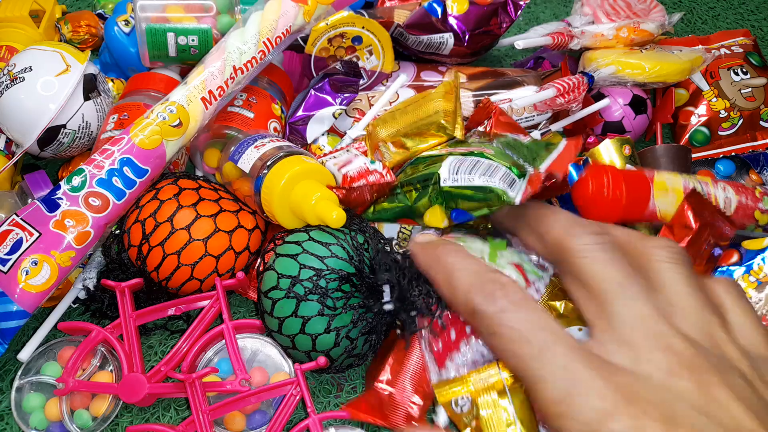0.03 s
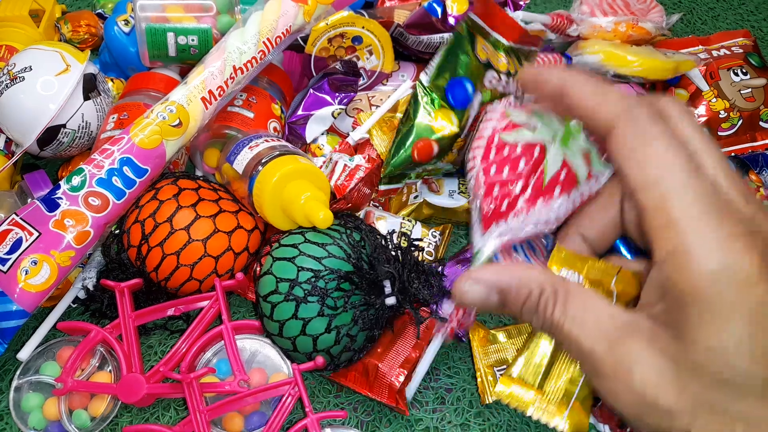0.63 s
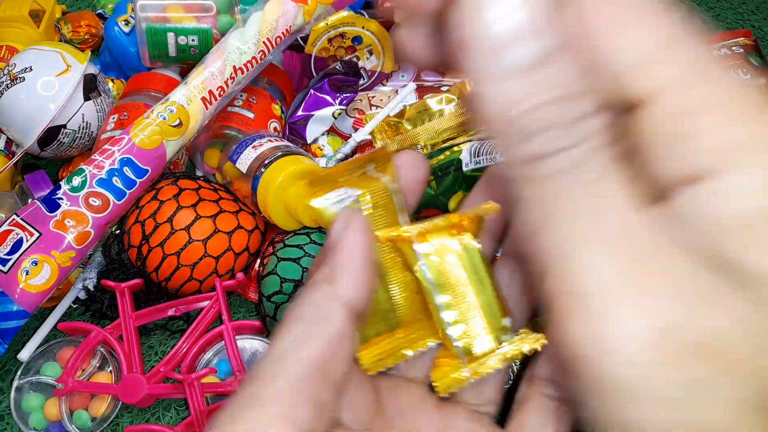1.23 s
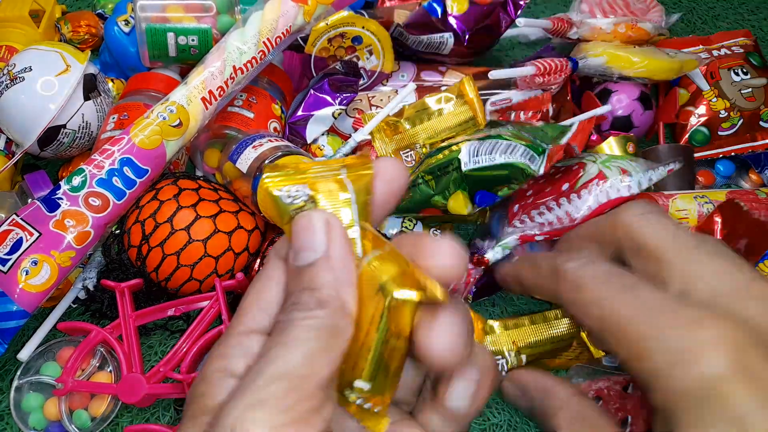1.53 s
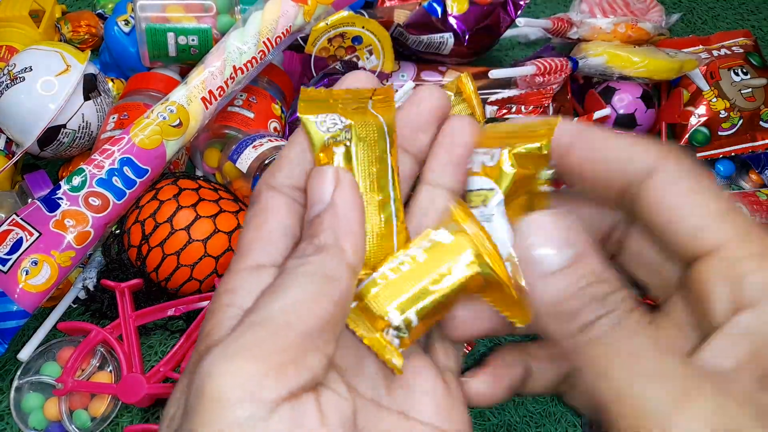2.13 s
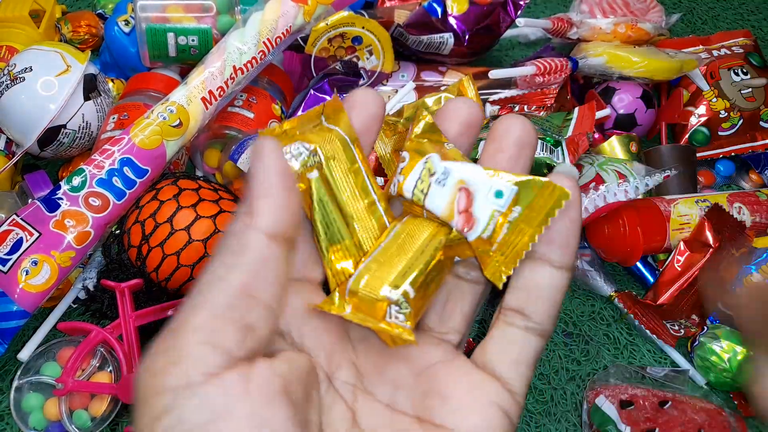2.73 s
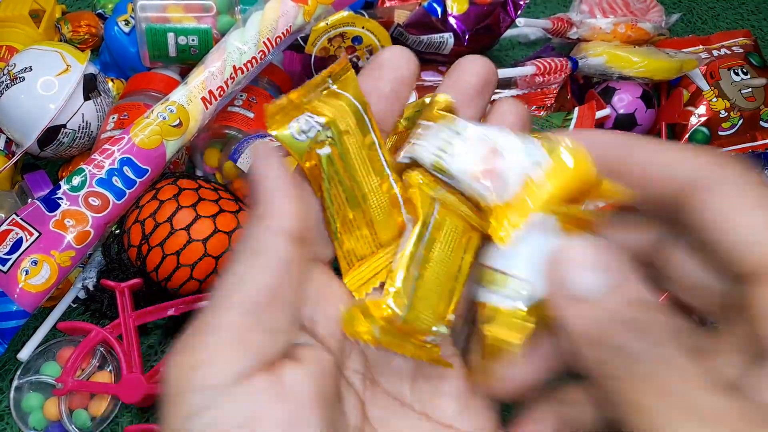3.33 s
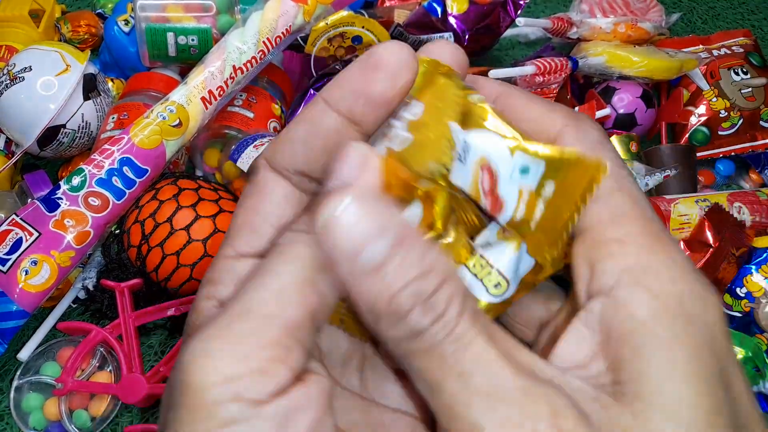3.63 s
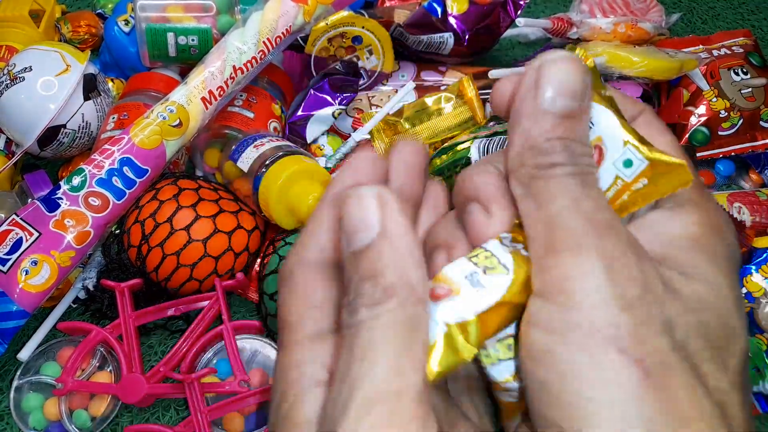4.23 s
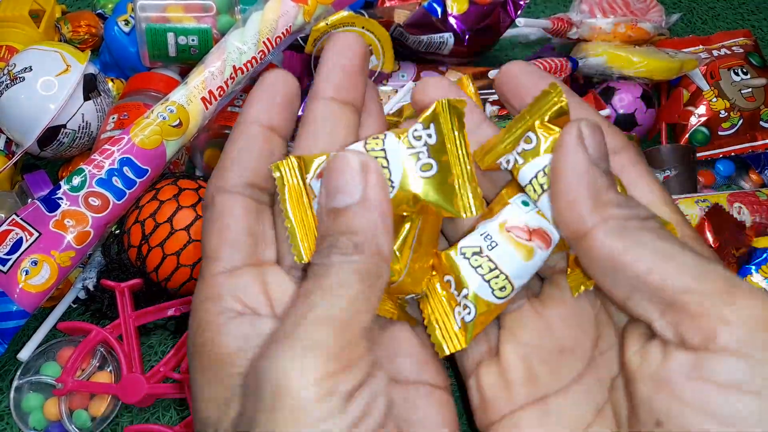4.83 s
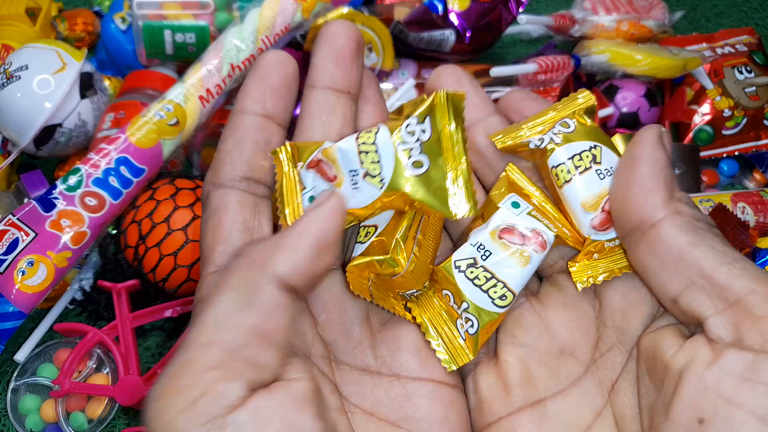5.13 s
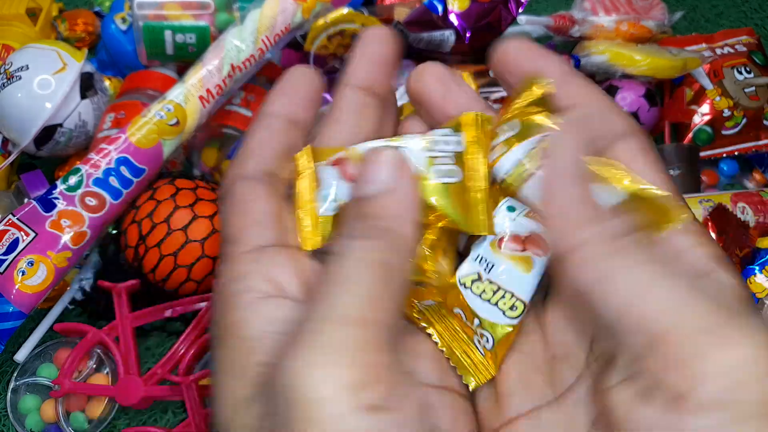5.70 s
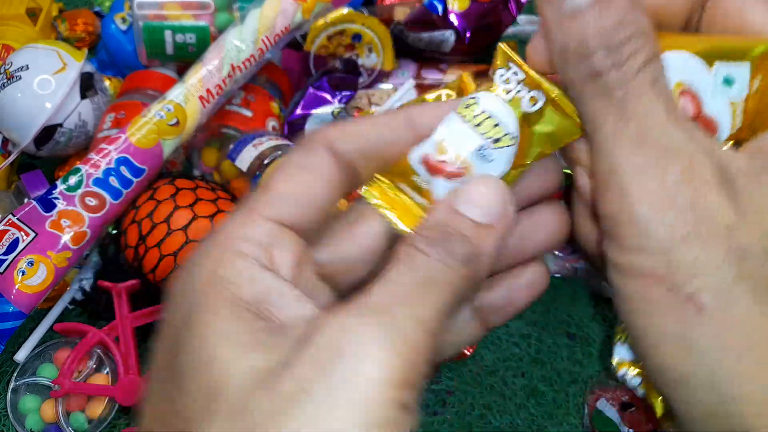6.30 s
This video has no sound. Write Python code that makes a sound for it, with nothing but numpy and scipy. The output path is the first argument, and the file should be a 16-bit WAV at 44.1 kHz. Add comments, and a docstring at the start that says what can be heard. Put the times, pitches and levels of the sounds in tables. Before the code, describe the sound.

Hands rummage in a heap of sweets and roll foil-wrapped bars between the palms, with close, sharp snaps, crackles and soft bumps.

```python
"""A sharp snap of foil and a soft thud: hands rummage in a heap of sweets on a mat, close to a stereo
microphone. They pick up a few bars in plastic foil and roll them between the palms. The foil buckles
in single snaps and in swarms of tiny crackles, the swarms coloured by the hollow of the hands or heap.
Sweets bump softly, the moving hands rumble, and a small furnished room with a low hum answers."""
import sys
import numpy as np
from scipy import signal
from scipy.fft import rfft, irfft, next_fast_len
from scipy.io import wavfile

SR = 44100
rng = np.random.default_rng(int(sys.argv[2]) if len(sys.argv) > 2 else 0)


def store_pcm(level_fs):
    """Save levels as 16-bit WAV."""
    pcm = np.round(np.clip(level_fs, -1, 1) * 32767).astype(np.int16)
    wavfile.write(sys.argv[1], SR, np.atleast_2d(pcm).T)


N = 284886
T = np.arange(N) / SR

# spectrum of the room's steady rumble: (frequency [Hz], relative level [dB])
ROOM_SPECTRUM = [(25, -2.5), (60, -10), (95, -1), (135, 11.5), (220, -0.5), (400, -38.5), (800, -80),
                 (2000, -31), (6000, -52.5), (16000, -45)]
# partials of the hum in the room: (frequency [Hz], level [dB])
HUM_PARTIALS = [(59.5, -74), (122, -71), (243, -74)]
# colour of the tail that comes back from the walls: (frequency [Hz], gain [dB])
WALL_COLOUR = [(60, 4), (400, -5), (2000, -7), (5000, -8.5), (16000, -9.5)]
# a hand digs in the heap and shifts the sweets: (start [s], length [s], rumble level [dB])
HEAP_DIGS = [(0.067, 0.75, -51.5), (1.551, 0.22, -49), (2.91, 0.089, -50.5)]
# sweets and knuckles bump each other, the heap and the mat: (time [s], level [dB], pitch [Hz], t60 [s])
SOFT_BUMPS = [(0.073, -24.5, 585, 0.061), (0.077, -42, 209, 0.27), (0.829, -35, 326, 0.058),
              (0.848, -33.5, 226, 0.2), (0.864, -45, 68, 0.38), (1.226, -29.5, 950, 0.026),
              (1.229, -33.5, 300, 0.051), (1.561, -31.5, 70, 0.1), (1.58, -30, 234, 0.11),
              (1.598, -32, 350, 0.045), (2.805, -39.5, 990, 0.048), (2.936, -51, 78.5, 0.57),
              (2.987, -45, 260, 0.043), (3.038, -45, 234, 0.23)]
# the fingers press or roll the foil inside a hollow, the heap or the cupped hands: (start [s], hold [s],
# crackle level [dB], hollow resonance [Hz], resonance height [dB], tilt [dB/octave])
FINGER_SQUEEZES = [(0.087, 0.24, -34.5, 700, -0.5, -2), (0.324, 0.4, -30.5, 1060, 1, -3),
                   (0.779, 0.078, -34, 1060, -1, -4), (0.943, 0.021, -44.5, 900, -4, -3.5),
                   (1.093, 0.061, -36, 704, -5, -3), (1.217, 0.071, -50.5, 680, 16, -2.5),
                   (1.477, 0.02, -43, 1450, 5, -0.5), (1.539, 0.19, -29.5, 700, -4.5, -2.5),
                   (1.802, 0.2, -38, 690, 8, 0), (2.092, 0.11, -42, 705, 2, 0),
                   (2.345, 0.047, -31.5, 704, -1.5, -1.5), (2.429, 0.13, -35.5, 1380, -1.5, -2),
                   (2.905, 0.034, -40, 680, 11, -2), (3.005, 0.028, -37, 704, -9, -4.5),
                   (3.172, 0.048, -51, 880, 7, 2), (3.366, 0.091, -37.5, 696, -4, -3.5),
                   (3.537, 0.17, -38.5, 675, 2.5, -3.5), (3.732, 0.086, -32.5, 704, 2, -1.5),
                   (3.87, 0.239, -28, 1800, 6.5, 0), (4.146, 0.13, -28.5, 2050, 8.5, 0),
                   (4.32, 0.041, -28, 2000, 8.5, -2), (4.378, 0.5, -36, 1650, 4.5, -2),
                   (4.67, 0.2, -40, 1410, 19, 4), (5, 0.21, -48.5, 1560, 3.5, -1),
                   (5.238, 0.21, -58, 930, -1, -2), (5.708, 0.068, -39.5, 720, 4.5, -0.5),
                   (5.806, 0.09, -31, 1660, 9, -2.5), (5.887, 0.09, -25.5, 2030, 10, -1),
                   (5.993, 0.22, -33, 2030, 10.5, -0.5), (6.283, 0.13, -33.5, 1830, 2, -1.2)]
# spectrum of a buckling facet of foil: (frequency [Hz], relative level [dB])
FOIL_SPECTRUM = [(100, -23), (400, -20), (700, -4.5), (1100, -8), (1900, -1), (2600, 1), (3500, 1.5),
                 (5200, 4), (7400, -1.5), (10400, -7.5), (13000, -2.5), (16000, -13.5)]
# large facets whose snaps stand out:
# (time [s], level [dB], ring [Hz], ring height [dB], tilt [dB/octave], left minus right [dB])
FOIL_SNAPS = [(0.0731, -17, 2360, 6.5, -7.5, -2), (0.152, -30.5, 1760, 22, -3.0, -4),
              (0.1606, -19, 12400, 9, -1, -2), (0.2256, -25, 2750, 2, 2, -1),
              (0.2486, -25.5, 1550, 14, -5, -3), (0.2689, -22.5, 4630, 0, -1.5, 2),
              (0.3331, -24.5, 2210, 29, -4, 0), (0.352, -24, 11000, 6, 7, 5),
              (0.3729, -14.5, 8750, 8, -4.5, 1), (0.4538, -22.5, 1310, 15, -0.5, -1),
              (0.4863, -19, 2450, 6, -7, 0), (0.492, -21, 7800, 8, -1, 10),
              (0.5062, -17, 1080, 27, -1.5, -2), (0.5344, -21.5, 7400, 10, -3, 9),
              (0.5384, -15, 1570, 9, -2.5, 1), (0.5441, -18.0, 1550, 6, 0, -1),
              (0.6946, -20, 1160, 10, -3, 2), (0.746, -16.5, 2460, 4.5, -0.5, 2),
              (0.8283, -24, 1310, 12, -8, -8), (0.844, -25.5, 6400, 5, 3, -7),
              (0.9064, -33.5, 2320, 8, 0.0, 1), (0.9349, -27, 880, 18.5, 0.5, -0.5),
              (1.0623, -25, 5510, 7.5, 0.5, 4.5), (1.089, -22.5, 1970, 15, 1.5, 4),
              (1.096, -31, 1840, 3, -4, 6), (1.1287, -22, 819, 4, -1, 7), (1.143, -19.5, 650, 14.5, 1, 0),
              (1.1529, -26, 5600, 19, -3.5, 5), (1.1829, -28, 5900, 12, -1, 3),
              (1.295, -39, 10400, 4, 2.5, 4), (1.3314, -41, 4200, 3, -3.0, 2),
              (1.4465, -45.5, 2770, 3, -3.5, 2), (1.5018, -17.5, 3640, 8, -1.5, 1.5),
              (1.6595, -26, 2450, 12, 2, 1), (1.6862, -27.5, 980, 9, -5, -5), (1.709, -19.5, 1300, 7, 0, 4),
              (1.7258, -17.5, 1380, 12, 1, -2), (1.7813, -24, 1740, 12, 0.5, 3),
              (1.8035, -19.5, 1050, 23, 1, -2), (1.8106, -16.5, 2700, 16, 2, 0),
              (1.864, -19, 2920, 16, 4.5, -2), (1.876, -20, 6550, 11.5, -1.5, 3),
              (1.8918, -20, 5400, 6, 0, 3), (1.9141, -23, 6550, 10, 5, -2),
              (1.922, -24.5, 3900, 26, -2, 1.5), (1.9584, -21, 12600, 5, -1, 3),
              (1.9781, -14, 5770, 16, 1.5, 0.5), (2.0465, -21.5, 5200, 16, 0.5, 1),
              (2.1069, -28.5, 660, 13.5, -1.5, 1), (2.2911, -31.0, 3280, 3, -1.5, 0),
              (2.3023, -26.0, 2440, 4, 1.5, 2), (2.3464, -21, 3300, 7, -1.0, 1),
              (2.3514, -22.5, 2920, 6, 1.5, 9), (2.3646, -20, 5200, 12, 5, -5),
              (2.4516, -18, 7350, 18, -0.5, 5), (2.4613, -18.5, 11000, 6, 1.5, 2),
              (2.4679, -25, 650, 15, -1, 1), (2.527, -20, 4180, 0, 0.5, 1), (2.894, -27, 1250, 20, 3.5, 0),
              (2.9049, -24, 4570, 6, 0.5, -4), (3.004, -26, 4340, 4, 0.5, 0), (3.0284, -29, 1720, 14, 1, 2),
              (3.0328, -23.5, 1230, 21, 5, -9), (3.1352, -35, 868, 13, 5, 0),
              (3.2706, -35.0, 1950, 6, 1, -6.5), (3.3012, -37.5, 1860, 9, -3.5, 3),
              (3.4144, -20.5, 1450, 11, -2, 2), (3.449, -16.5, 2130, 3.5, 2, 3.5),
              (3.4606, -20.5, 2780, 3, 2, -3), (3.4855, -24.5, 4700, 16, -1, 2),
              (3.6168, -31, 4130, 14, -8, 0), (3.6762, -22, 5200, 7, 0.5, 5), (3.698, -20, 4910, 12, -4, 4),
              (3.7234, -16.5, 3120, 12, 0.0, 4), (3.751, -23, 689, 23, 7, 2),
              (3.7764, -17.5, 650, 17, 1, -1), (3.7847, -23, 5510, 7, 0, 6),
              (3.8061, -20, 12400, 5, -4.5, 6), (3.8518, -18.5, 4370, -6, -3, 3),
              (3.8569, -18, 910, 19, 0, 1), (3.8884, -19, 2190, -6, -1, 8.5),
              (3.9008, -14.5, 974, 11.5, -0.5, -1), (3.915, -20.0, 3700, 8, -2.0, 0),
              (3.975, -24, 9820, 12, -4, 5), (3.9923, -22, 1580, 19, 0.0, 4),
              (4.015, -23, 2000, 12, -2.0, 4), (4.0211, -22.5, 1800, 8, -7.5, 6),
              (4.062, -23.5, 6940, 4, 1, 5), (4.0848, -16.5, 9900, 13, -2.5, 2),
              (4.095, -18, 1530, 9, -4, 4), (4.1117, -12.5, 5350, 16, 7, 1),
              (4.1247, -20, 1620, 20.5, 1.5, -2), (4.1369, -17.5, 2180, 19.5, -1, 3),
              (4.1546, -15, 2190, 15.5, 4.5, 1), (4.1859, -22, 3300, 19, -1.0, -5),
              (4.218, -17.5, 1740, 11, 8.5, 3), (4.2581, -18, 1640, 12, -0.5, 5),
              (4.2707, -17.5, 1760, 14, -3, 6), (4.3288, -22, 2600, 22, 7, 5),
              (4.3717, -19, 2240, 28, 3, 10), (4.487, -16, 7500, 0, -1.5, 0.5),
              (4.5258, -15.5, 2020, 16, -1, 4), (4.5841, -22.5, 1630, 9.5, -2, 6),
              (4.5934, -20.5, 800, 12.5, -1.0, 2), (4.634, -22.5, 1740, 16, 0.5, 8),
              (4.6625, -23.5, 1310, 20, -5.5, 2.5), (4.676, -17.5, 5200, 2, 1.5, 5),
              (4.679, -17, 5200, 3, -1.5, 1), (4.711, -18, 1370, 19, -1.5, 5),
              (4.723, -20.0, 5800, 12, 0.5, 5), (4.755, -26, 2920, 7.5, -4, 5),
              (4.7976, -19.5, 1190, 10.5, -2.5, 1), (4.818, -19, 6600, 9, 0.5, 3),
              (4.8226, -21.5, 1550, 10, 0.0, -3), (4.8518, -21.5, 9100, 5.5, 0, 6),
              (4.8698, -26, 8000, 16, -1, 2), (4.8814, -27.5, 3600, 19.5, 1, -3),
              (5.0468, -23.5, 2100, 20.5, -1.5, 4.5), (5.0819, -25.5, 4130, 17, 3, 4),
              (5.1101, -30.5, 1880, 5.5, -4, 3), (5.1321, -28, 1740, 10.5, -0.5, 5),
              (5.138, -29.5, 1470, 12, -4, 0), (5.1649, -31.5, 730, 9.5, -1, -1),
              (5.2354, -26.0, 868, 11, 2, 4), (5.2412, -29, 3680, 21.5, 2.5, -8),
              (5.2726, -35, 960, 14.5, -4.5, -1), (5.2977, -34.5, 1840, 9, -2.5, 2),
              (5.333, -35.5, 7350, 8.5, -1.5, 3), (5.3564, -20, 4160, 6.5, -2, 2),
              (5.4075, -21.0, 1930, 8, 1, -3), (5.452, -42.0, 1195, 19, -6.5, -2),
              (5.6152, -55.5, 1400, 5, -2.5, 4.5), (5.7045, -24, 4300, 10, -1.5, 5.5),
              (5.7693, -24, 2320, 6, -5, 4), (5.7801, -21, 1300, 15, 0, 0), (5.8177, -21, 868, 6, -1, -2),
              (5.8396, -17.5, 1420, 14, -1.5, 1), (5.9048, -12.5, 1400, 11, -1.5, 2),
              (5.935, -16.5, 2450, 8, -4, -4), (5.9413, -10.5, 2460, 12, -1.5, 3),
              (5.948, -17, 1640, 17, 8, 4), (5.9715, -15.5, 1930, 23, 4, 1),
              (6.0006, -18.5, 2190, 15, -3.5, 2), (6.043, -21, 1580, 18, 2.5, 3),
              (6.0531, -18.5, 2040, 11, 2.5, 0), (6.0764, -16.5, 12400, 4, -1.5, 3),
              (6.111, -17.5, 2190, 15, 4, 0), (6.1292, -21, 1300, 4, 2.5, 3),
              (6.1585, -18, 5470, 9, -2.5, 2), (6.178, -28, 5510, 22, -4, -7),
              (6.2036, -20, 1720, 15, -2.5, 1), (6.2848, -21, 2060, 6, -1, 1),
              (6.2904, -16.5, 11700, 2, 2.5, 8), (6.3334, -20, 8800, 16, -4, 6),
              (6.3398, -17.5, 1950, 15, 2, 8), (6.3637, -18, 1910, 5, -0.5, 0),
              (6.3981, -14.5, 1270, 22.5, 5, 1)]
# sensitivity of the two microphone ports: (frequency [Hz], left minus right [dB])
PORT_BALANCE = [(2000, 0), (6500, 0), (7500, 4.5), (8600, 5), (9700, 11), (11000, -0.5), (13500, -1),
                (15500, 14.5)]

CLICK_SIZE, BANK_SIZE = 512, 251  # samples in a click, different cracks to draw on
CLICK_HZ = np.fft.rfftfreq(CLICK_SIZE, 1 / SR)
TILT_OCTAVES = np.log2(np.maximum(CLICK_HZ, 600) / 3000)  # tilts pivot at 3 kHz, flat below 600 Hz


def undb(db):
    """Decibels to gain."""
    return 10 ** (np.asarray(db) / 20)


def unit(x):
    """Scale to rms 1."""
    return x / np.sqrt(np.mean(x ** 2))


def curve(table, t):
    """The columns of a time table, read at times t."""
    times, *columns = np.transpose(table)
    return [np.interp(t, times, column) for column in columns]


def shape_db(points, f):
    """A spectrum of (frequency [Hz], level [dB]) points, read on a log-frequency axis."""
    hz, db = np.transpose(points)
    return np.interp(np.log(f + 1), np.log(hz), db)


def colour(x, points):
    """Filter x by (frequency [Hz], gain [dB]) points."""
    n = x.shape[-1]
    size = next_fast_len(n + CLICK_SIZE)
    gain = undb(shape_db(points, np.fft.rfftfreq(size, 1 / SR)))
    return irfft(rfft(x, size) * gain, size)[..., :n]


def minimum_phase(db):
    """The response with these gains that rings only after the blow."""
    cepstrum = irfft(np.log(undb(db)))
    fold = np.r_[1, np.full(CLICK_SIZE // 2 - 1, 2), 1, np.zeros(CLICK_SIZE // 2 - 1)]
    return np.exp(rfft(cepstrum * fold))


def resonance(hz, octaves, order=2):
    """One bell of height 1 in a click's spectrum for each centre; a higher order flattens its top."""
    return 1 / (1 + (np.log2((CLICK_HZ + 1) / hz[:, None]) / octaves) ** order)


def add(out, s, sound):
    """Mix a stereo sound in at time s."""
    i = int(np.clip(s * SR, 0, N - 1))
    out[:, i:i + sound.shape[-1]] += sound[:, :N - i]


def room_tone():
    """The room itself: a low steady rumble with a hum in it, a little stronger on the left."""
    mid, side = colour(rng.standard_normal((2, N)), ROOM_SPECTRUM)
    rumble = undb(-65.5) * (unit(mid) + undb(-10) * np.outer([1, -1], unit(side)))
    hum = sum(np.sqrt(2) * undb(db) * np.sin(2 * np.pi * (hz * T + rng.random()))
              for hz, db in HUM_PARTIALS)
    return (rumble + hum) * undb([[2], [-2]])


def room_reflections(x, t60_s=0.075, wet_db=-4.0, mat_db=-16):
    """The mat throws each click straight back; the small room adds a tail, narrower in the bass."""
    t = T[:SR // 2]
    build = np.interp(t, [.002, .007], [0, 1])
    mid, side = rng.standard_normal((2, len(t))) * np.exp(-np.log(1000) * t / t60_s) * build
    tail = mid + np.outer([1, -1], colour(side, [(500, -9), (2200, 0)]))
    response = undb(wet_db) * colour(tail / np.sqrt(np.sum(tail ** 2) / 2), WALL_COLOUR)
    response[[0, 1], [int(.0022 * SR), int(.0024 * SR)]] += undb(mat_db)
    return x + signal.fftconvolve(x, response, axes=1)[:, :N]


def hand_rumble(grip, rumble_db=-58, follow=0.22, fade_db_per_s=129):
    """Moving hands give a soft rumble that grows with the effort and swells as they dig in the heap."""
    spectrum = [(30, -21.5), (55, -4.5), (90, -4.5), (130, -1.0), (260, 1.5), (1200, -29.5)]
    mid, side = colour(rng.standard_normal((2, N)), spectrum)
    noise = np.outer(undb([2, -2]), unit(mid)) + undb(-6.0) * np.outer([1, -1], unit(side))
    grip_db = curve(grip, T)[0]
    moving = undb(rumble_db + follow * (grip_db - grip_db.max()))
    digging = sum(undb(db - fade_db_per_s * np.maximum(T - s - length, 0)) * (T > s)
                  for s, length, db in HEAP_DIGS)
    return noise * np.hypot(moving, digging)


def bumps():
    """Soft blows on the heap: loose sweets shift and give a dull, damped thud around one pitch."""
    out, t = np.zeros((2, N)), T[:SR // 2]
    for s, db, hz, t60 in SOFT_BUMPS:
        band = signal.butter(2, [hz / 1.6, hz * 1.6], "band", fs=SR, output="sos")
        shifts = np.sign(signal.sosfilt(band, rng.standard_normal(len(t))))
        thud = signal.sosfilt(band, shifts * np.exp(-np.log(1000) * t / t60))
        add(out, s, np.outer(undb([1, -1]), thud) * undb(db))
    return out


def finger_grip(attack_db_per_s=894, release_db_per_s=405.5, touch_db_per_s=231,
                relax_db=-18.5, relax_db_per_s=56, slip_db=3, slip_s=0.036):
    """The fingers close quickly on the foil, hold, and let go more slowly.
    Rows: (time [s], crackle level [dB], hollow resonance [Hz], height [dB], tilt [dB/octave])."""
    t = np.arange(0, N / SR, .002)
    start, hold, db, *hollow = np.transpose(FINGER_SQUEEZES)[:, :, None]
    early, late = np.maximum(start - t, 0), np.maximum(t - start - hold, 0)
    press = undb(db - attack_db_per_s * early - release_db_per_s * late)
    # the fingers brush the foil before they press; released, it creeps back into shape
    creep = undb(db + relax_db - touch_db_per_s * early - relax_db_per_s * late)
    power = press ** 2 + creep ** 2 + 1e-18
    total = power.sum(axis=0)
    # the fingertips catch and slip
    slips = np.interp(t / slip_s, np.arange(len(t)), 2 * rng.random(len(t)) - 1)
    blended_hollow = [np.sum(power * column, axis=0) / total for column in hollow]
    return np.column_stack([t, 10 * np.log10(total) + slip_db * slips, *blended_hollow])


def buckles(times, db, pan_db, facet_db, kinds, crack_s,
            rise_s=.00025, flutter_s=.002, flutter_db=-12, apart_hz=3800, lag_s=0.000086):
    """Foil facets flip: a brief crack, a neighbour just before or after, a faint flutter of the sheet."""
    def swell(t, fall_s):
        return np.exp(np.minimum(t / rise_s, -t / fall_s))

    lead = CLICK_SIZE // 8  # the facet creeps just before it flips
    t = (np.arange(CLICK_SIZE) - lead) / SR
    noise = rng.standard_normal((BANK_SIZE, 3, CLICK_SIZE))  # shared, left, right
    neighbour_t = t - rng.uniform(-.001, .0016, (BANK_SIZE, 1, 1))
    neighbour = .6 * rng.random((BANK_SIZE, 1, 1)) * swell(neighbour_t, crack_s)
    flutter = undb(flutter_db) * swell(t, flutter_s)
    burst = rfft(noise * (swell(t, crack_s) + neighbour + flutter))
    burst /= np.sqrt(abs(burst))  # a crack holds all frequencies, with only shallow dips
    burst /= np.sqrt(np.mean(abs(burst) ** 2, axis=2, keepdims=True))
    # long waves reach both microphone ports alike, the left one first; short ones are beamed unevenly
    beamed = CLICK_HZ ** 2 / (CLICK_HZ ** 2 + apart_hz ** 2)
    bearing = rng.random(BANK_SIZE) + rng.random(BANK_SIZE)  # each facet lies at its own angle
    lag = np.exp(-2j * np.pi * np.outer(bearing, [0, lag_s])[:, :, None] * CLICK_HZ)
    at_ports = np.sqrt(1 - beamed) * burst[:, :1] * lag + np.sqrt(beamed) * burst[:, 1:]
    ring = minimum_phase(shape_db(FOIL_SPECTRUM, CLICK_HZ) + facet_db)
    clicks = irfft(at_ports[kinds % BANK_SIZE] * ring[:, None])
    clicks *= np.sqrt(.003 * SR / np.sum(clicks ** 2, axis=2, keepdims=True))  # rms 1 over 3 ms
    clicks *= undb(db[:, None] + np.outer(pan_db, [1, -1]) / 2)[:, :, None]
    out = np.zeros((2, N))
    for s, click in zip(times, clicks):
        add(out, s - lead / SR, click)
    return out


def crackles(grip, count, spread_db, thinning, gain_db, ring_db, tilt_spread_db):
    """Small creases give way, louder and more uneven in a hard squeeze; thinning makes a light one sparse."""
    jitter, size_draw, chance, pitch_draw = rng.random((count, 4)).T
    tilt_scatter, pan_scatter = rng.standard_normal((count, 2)).T
    per_s = count * SR / N
    times = (np.arange(count) + 2 * jitter) / per_s
    grip_db = curve(grip, times)[0]
    effort = np.interp(grip_db, [-60, -40], [.35, 1])
    size = undb(spread_db * np.minimum(-np.log(size_draw), 2.6))
    density_db = 10 * np.log10(per_s * .003)  # the 3 ms clicks share the swarm's power
    db = grip_db + effort * 20 * np.log10(unit(size)) - density_db + gain_db
    live = np.flatnonzero(chance < effort ** thinning)
    _, hollow_hz, hollow_db, tilt_db = curve(grip, times[live])
    facet_hz = 950 * 2 ** (3.8 * pitch_draw[live] ** 1.5)  # broad, low facets are the commonest
    facet_db = ring_db * resonance(facet_hz, octaves=0.15, order=4)
    facet_db += np.outer(tilt_db + tilt_spread_db * tilt_scatter[live], TILT_OCTAVES)
    facet_db += hollow_db[:, None] * resonance(hollow_hz, octaves=0.61)
    pan_db = 0.32 + 3.9 * pan_scatter[live]
    return buckles(times[live], db[live], pan_db, facet_db, kinds=live, crack_s=.00036)


def snaps(gain_db=0.03):
    """Close to the microphone, large facets snap through one at a time, each with its own broad ring."""
    times, db, hz, ring_db, tilt_db, pan_db = np.transpose(FOIL_SNAPS)
    facet_db = ring_db[:, None] * resonance(hz, octaves=0.35) + np.outer(tilt_db, TILT_OCTAVES)
    return buckles(times, db + gain_db, pan_db, facet_db, kinds=np.arange(len(times)), crack_s=.00038)


def scene():
    """Up close, snaps, crackles, the rustle of foil sliding on skin and bumps; behind them, the room."""
    grip = finger_grip()
    creases = crackles(grip, count=850, spread_db=2.0, thinning=0.32,
                       gain_db=-1.0, ring_db=15.5, tilt_spread_db=2.5)
    rustle = crackles(grip, count=4000, spread_db=5.0, thinning=0,
                      gain_db=-3.5, ring_db=12, tilt_spread_db=3.5)
    close_sounds = snaps() + creases + rustle + bumps()
    return room_reflections(close_sounds) + hand_rumble(grip) + room_tone()


def record(dry, ceiling=0.79, opens_s=.069, top_hz=16000):
    """The two microphone ports colour the treble differently; the recorder opens after a moment
    and cuts the top. The hardest foil snaps are softly rounded off."""
    ports = np.array([colour(channel, [(hz, side * db / 2) for hz, db in PORT_BALANCE])
                      for channel, side in zip(dry, (1, -1))])
    rounded = ceiling * np.tanh(ports / ceiling)
    lowpass = signal.ellip(10, .2, 70, top_hz, fs=SR, output="sos")
    return signal.sosfilt(lowpass, rounded * (T > opens_s))


dry = scene()
out = record(dry)
store_pcm(out)
```